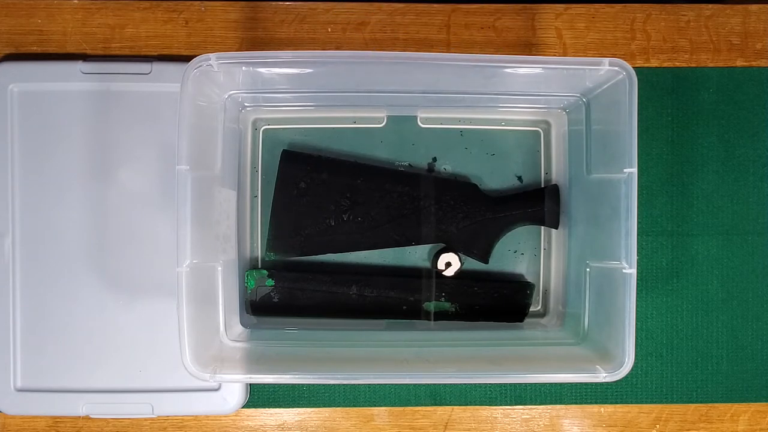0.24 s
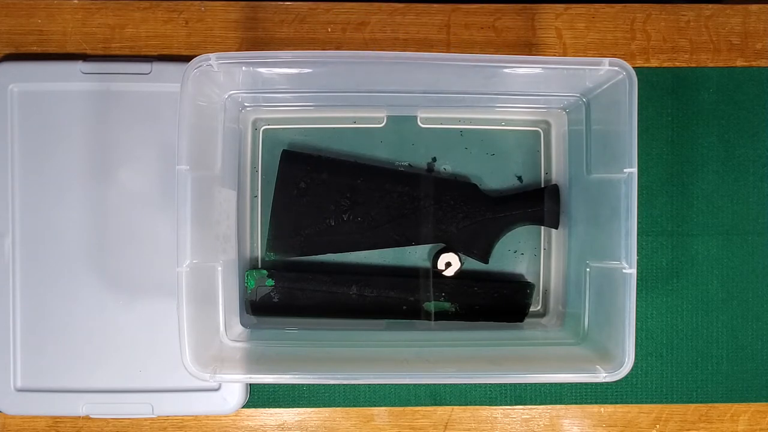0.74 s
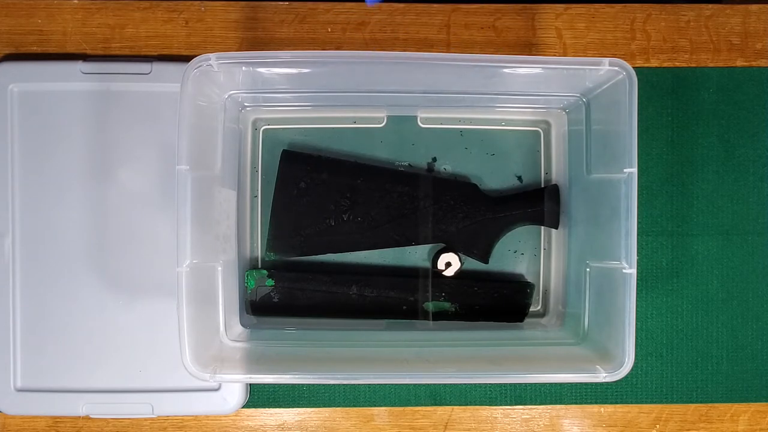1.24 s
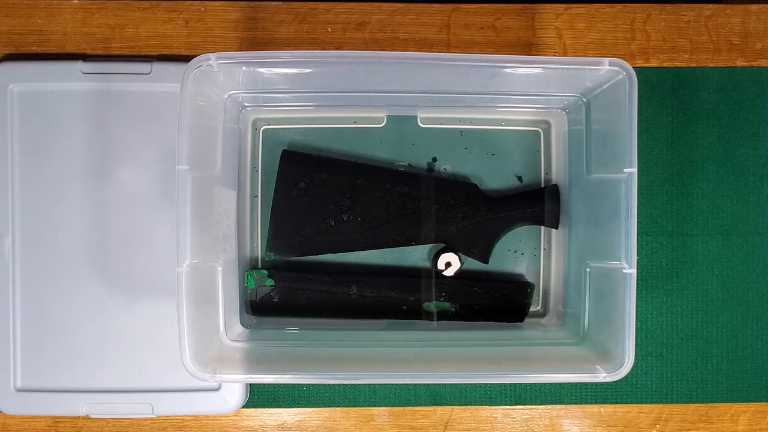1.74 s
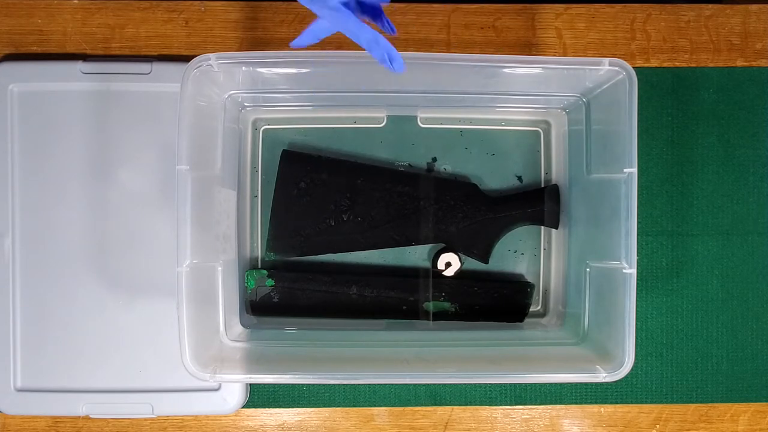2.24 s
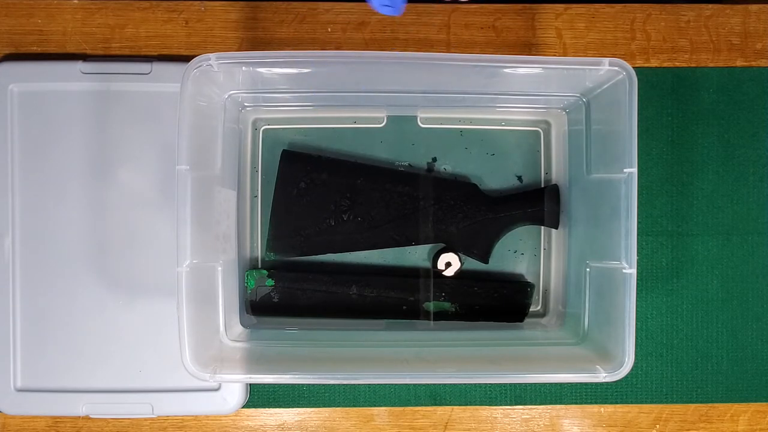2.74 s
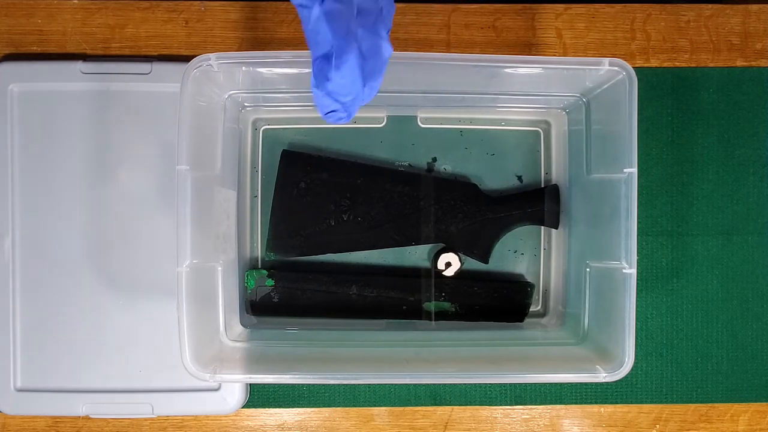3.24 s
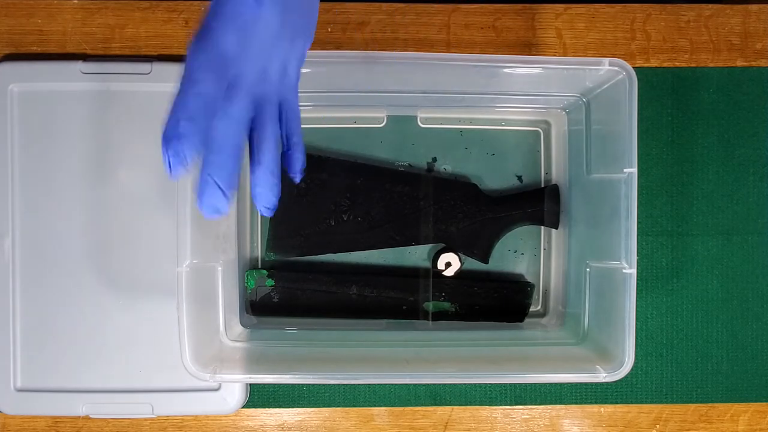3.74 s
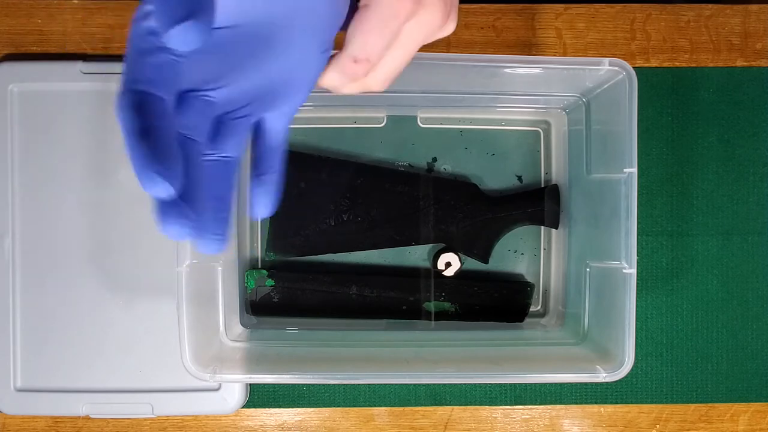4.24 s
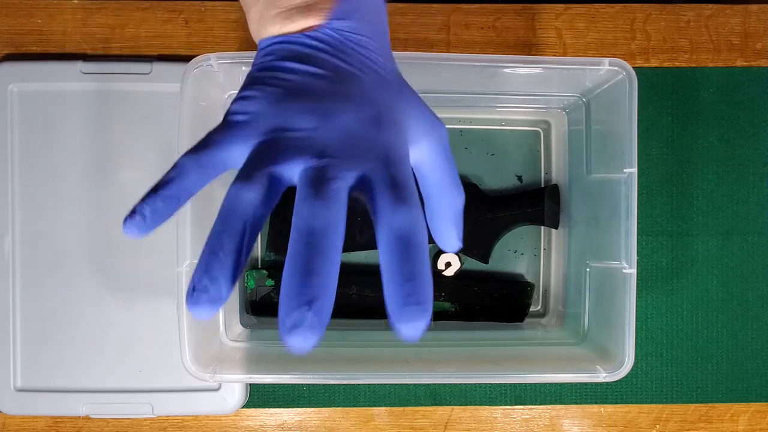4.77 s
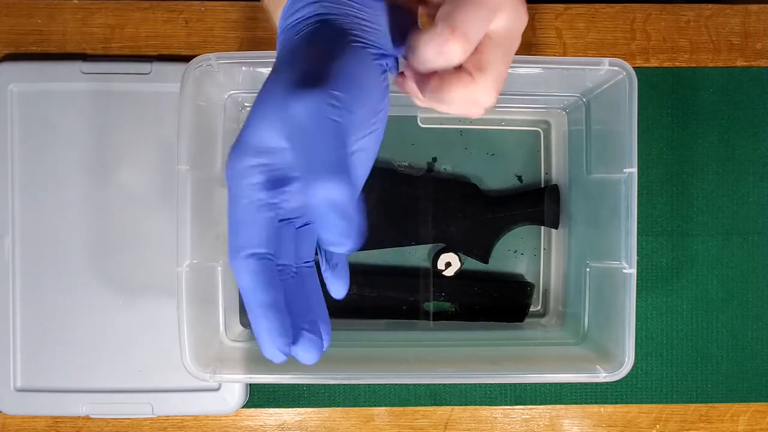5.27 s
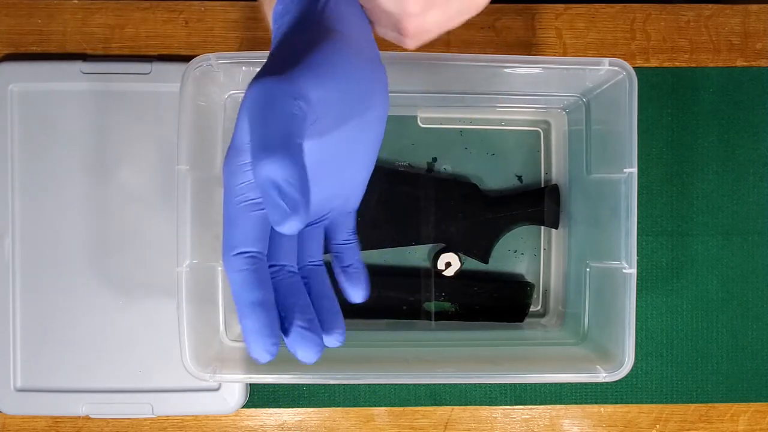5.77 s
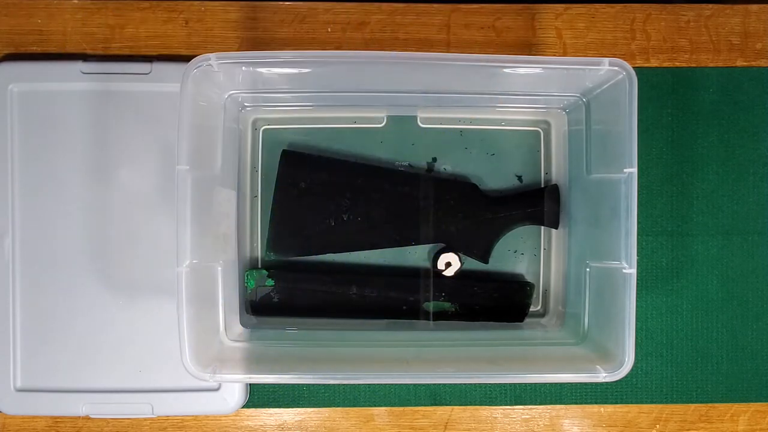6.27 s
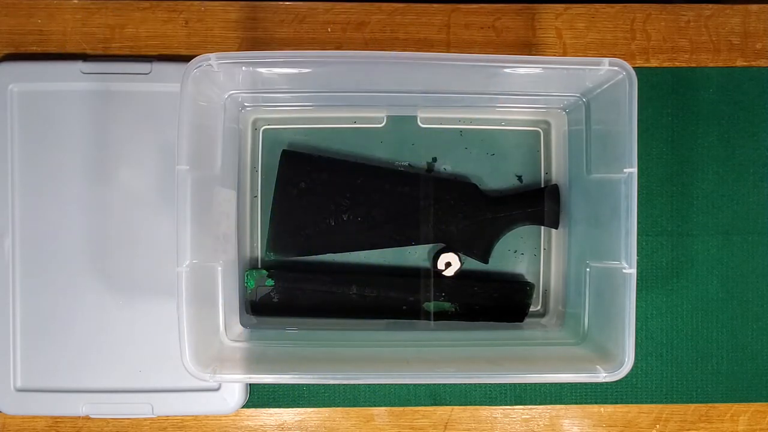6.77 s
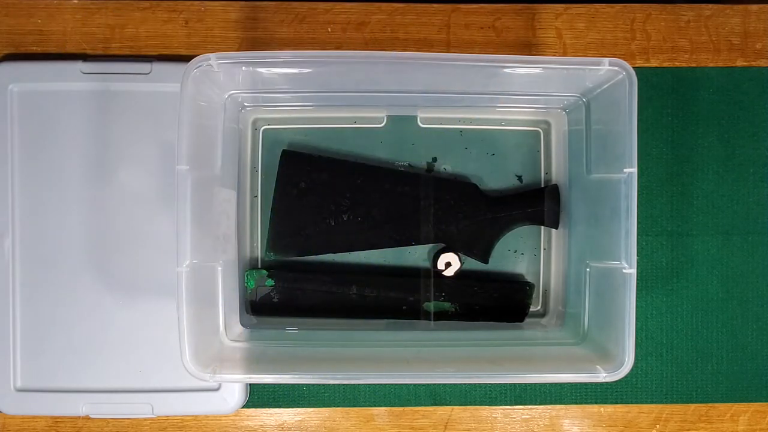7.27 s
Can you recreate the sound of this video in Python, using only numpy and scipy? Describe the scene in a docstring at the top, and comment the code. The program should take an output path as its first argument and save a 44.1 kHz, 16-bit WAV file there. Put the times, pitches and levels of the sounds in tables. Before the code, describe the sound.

Snapping, rustling and squeaky rubbing of thin rubber gloves being put on at a bench, over faint room tone and distant fan whine.

```python
"""A bench in a small room: thin rubber gloves are pulled on, over room tone and a small fan whining far off.
Sliding skin is hissing noise; crinkles are random clicks ringing patches of film; swishes are gliding noise.
Creaks are trains of slips, snaps are noise bursts, knocks are single rings and pushed air is low rumble.
The gloves also echo off the walls, and two unlike microphone ports pick everything up."""
import sys
import numpy as np
from scipy import signal
from scipy.fft import rfft, irfft
from scipy.io import wavfile

SR = 44100
rng = np.random.default_rng(int(sys.argv[2]) if len(sys.argv) > 2 else 0)


def inscribe(sig):
    """Save sig as 16-bit PCM at rate SR to the path in sys.argv[1].

    A 1-D sig is mono; a 2-D sig holds one channel per row.
    Samples are clipped to [-1, 1] before scaling.
    """
    pcm = np.round(np.clip(np.atleast_2d(sig).T, -1, 1) * 32767)
    wavfile.write(sys.argv[1], SR, pcm.astype(np.int16))


N = 331058   # length of the sound in samples


def from_db(db):
    """Turn a level in dB into a gain."""
    return 10 ** (np.asarray(db) / 20)


def rms_one(x):
    """Scale a sound to an rms (average strength) of 1."""
    return x / np.sqrt(np.mean(x ** 2) + 1e-20)


def in_time(rows):
    """Draw straight lines through a table's rows: one curve per column, one value per sample."""
    s, *columns = np.transpose(rows)
    t = np.arange(N) / SR
    return [np.interp(t, s, column) for column in columns]


def colour(x, points, share=1):
    """Filter whose gain follows the points; it answers as promptly as possible (minimum phase)."""
    hz, db = np.transpose(points)
    grid_hz = np.maximum(np.arange(1025) * SR / 2048, 1)
    gain_db = share * np.interp(np.log(grid_hz), np.log(np.maximum(hz, 1)), db)
    # Folding the cepstrum onto positive times leaves no sound before its cause.
    cepstrum = irfft(np.log(from_db(gain_db)))
    cepstrum[1:1024] *= 2
    cepstrum[1025:] = 0
    response = irfft(np.exp(rfft(cepstrum)))
    if x.ndim > 1:
        response = response[None]
    return signal.oaconvolve(x, response)[..., :x.shape[-1]]


def band(x, low_hz, high_hz):
    """Keep mainly the pitches between two limits."""
    sos = signal.butter(2, [low_hz, high_hz], "band", fs=SR, output="sos")
    return signal.sosfilt(sos, x)


def ring(x, hz, t60):
    """A unit click rings to about 1 and fades 60 dB in t60 s; thin film radiates little far below its pitch."""
    decay = from_db(-60 / (t60 * SR))
    turn = 2 * np.pi * hz / SR
    return signal.lfilter([.5, 0, -.5], [1, -2 * decay * np.cos(turn), decay * decay], x + 1e-18)


def grains(per_s, spread_db):
    """Scatter random clicks: many small, few large."""
    sizes = from_db(spread_db * np.minimum(rng.exponential(1, N), 4))
    sizes = sizes * rng.choice([-1, 1], N)
    return sizes * (rng.random(N) < per_s / SR)


def buckling(per_s, spread_db, low_hz, high_hz, cycles):
    """Each flipping fold rings a patch of its own size, fading 60 dB in the given cycles; rms 1."""
    clicks = grains(per_s, spread_db)
    patch = rng.integers(0, 16, N)
    total = np.zeros(N)
    for k, hz in enumerate(np.geomspace(low_hz, high_hz, 16)):
        total += ring(clicks * (patch == k), hz, cycles / hz)
    return rms_one(total)


SWELL_RANGE_DB = 20   # each rise or fall time covers this much


def swells(s, rise_s, fall_s, peaks_db, rest_db):
    """Gain of each layer: events climb and die straight in dB; their powers add to a rest level."""
    late = np.arange(0, N + 64, 64)[:, None] / SR - s   # one step per 64 samples
    before = -late / np.maximum(rise_s, .005)
    after = late / np.maximum(fall_s, .005)
    under_db = SWELL_RANGE_DB * np.where(late < 0, before, after)
    power = from_db(-2 * under_db) @ from_db(2 * np.transpose(peaks_db))   # doubled dB give power
    power = power + from_db(2 * np.array(rest_db))
    return [np.interp(np.arange(N) / 64, np.arange(len(p)), np.sqrt(p)) for p in power.T]


def narrow_noise(hz, width_hz):
    """Noise gathered round a pitch that may move; rms 1."""
    lowpass = signal.butter(2, width_hz / 2, fs=SR, output="sos")
    slow = signal.sosfilt(lowpass, rng.standard_normal((2, N)))
    carrier = np.exp(2j * np.pi * np.cumsum(hz * np.ones(N)) / SR)
    return rms_one(np.real((slow[0] + 1j * slow[1]) * carrier))


# Tone colour of the quiet room; only its shape counts: (frequency [Hz], gain [dB])
ROOM_COLOUR = [(15, -48.5), (25, -42), (92, 8.5), (192, -77.5), (358, -36.5), (568, 11), (787, -3.5),
               (1120, 9.5), (1430, -10.5), (1730, 5.5), (4020, -22), (6550, -7.5), (7710, -69),
               (14800, -29.5), (16500, -3.5)]
# Steady tones of the fan: (frequency [Hz], rms level [dB])
FAN_TONES = [(559.9, -82.5), (1120, -72.5)]
# Airy noise of the fan: (frequency [Hz], width [Hz], rms level [dB])
FAN_AIR = [(1675, 170, -83.5), (2280, 84, -85), (3280, 79, -86)]
ROOM_TONE_DB = -66   # rms


def background():
    """Room tone, more alike at both ports in the bass, plus a fan's slightly wavering tones and airy bands."""
    white = rng.standard_normal((3, N))
    noise = white[:2] + 0.5 * band(white[2], 20, 760)   # the third noise is shared
    total = from_db(ROOM_TONE_DB) * rms_one(colour(noise, ROOM_COLOUR))
    t = np.arange(N) / SR
    waver = np.cumsum(rng.standard_normal(N)) * 0.012   # wandering phase [radians at 1000 Hz]
    for hz, db in FAN_TONES:
        phase = 2 * np.pi * hz * t + waver * hz / 1000
        total = total + np.sqrt(2) * from_db(db) * np.sin(phase)
    for hz, width_hz, db in FAN_AIR:
        total = total + from_db(db) * narrow_noise(hz, width_hz)
    return total


# Tone colour of sliding skin; only its shape counts: (frequency [Hz], gain [dB])
HISS_COLOUR = [(2650, -30), (4500, -9.5), (5330, -13), (6550, -3), (8320, -15), (10400, -11.5),
               (11600, -10), (15000, -4), (16100, -16.5), (16500, -39.5)]
# Rubs of skin and film: (time of peak [s], rise [s], fall [s],
#   hiss level [dB], small folds level [dB], middle folds level [dB], big folds level [dB])
RUB_EVENTS = [(0.03, 0.069, 0.54, -68, -59.5, -54, -64), (0.389, 0.068, 0.084, -62, -77.5, -49.5, -50),
              (0.52, 0.41, 0.45, -66.5, -90, -66.5, -71), (0.649, 0.058, 0.086, -63.5, -57, -54.5, -57),
              (0.739, 0.026, 0.03, -84, -80, -55.5, -82), (0.805, 0.046, 0.079, -68.5, -66.5, -70, -83),
              (0.88, 0.014, 0.22, -100, -64, -60, -87), (0.95, 0.13, .12, -74, -59, -74, -92),
              (1.006, 0.042, 0.45, -66, -57, -49.5, -59), (1.27, 0.57, 0.12, -70, -89.5, -84.5, -94.5),
              (1.48, 0.05, 0.78, -72.5, -84, -98, -94), (1.708, 0.11, 0.13, -59, -58, -50.5, -87),
              (1.831, 0.013, 0.18, -53, -61, -58, -53), (1.899, 0.11, 0.17, -48.5, -42, -42, -53),
              (2.15, 0.052, 0.14, -59.5, -50.5, -47.5, -72), (2.445, 0.028, 0.21, -72, -65, -71.5, -94),
              (2.548, 0.061, 0.12, -55, -62.5, -59.5, -78), (2.69, 0.34, 0.42, -64, -69, -64, -75),
              (2.845, 0.11, 0.14, -56.5, -59, -64, -72), (2.912, 0.12, 0.072, -63, -57, -50, -50.5),
              (3.03, 0.34, 0.98, -91, -75, -64.5, -85), (3.25, 0.51, 0.23, -90, -99, -65, -70),
              (3.32, 0.066, 0.99, -82, -63, -55, -57), (3.502, 0.12, 0.089, -48, -48.5, -56.5, -54),
              (3.554, 0.037, 0.14, -51, -71, -63.5, -58.5), (3.672, 0.014, 0.14, -62, -55.5, -63, -58),
              (3.73, 0.13, 0.38, -45.5, -53.5, -49.5, -55.5), (3.92, 1, 0.3, -55, -75, -70, -107),
              (4.117, 0.097, 0.026, -47, -57, -53, -101), (4.17, 0.09, 0.063, -45.5, -45.5, -43.5, -81.5),
              (4.335, 0.059, 0.066, -42.5, -63, -53, -56), (4.387, 0.11, 0.055, -40.5, -37.5, -32.5, -59),
              (4.601, 0.096, 0.05, -66, -43, -42, -55), (4.773, 0.042, 0.12, -50.5, -54.5, -57.5, -61),
              (4.968, 0.16, 0.52, -60, -66.5, -62, -69.5), (5.16, 0.069, 0.087, -46, -49, -55, -71),
              (5.33, 0.24, 0.16, -65, -68.5, -65, -76), (5.525, 0.19, 0.073, -57.5, -61.5, -58, -70),
              (5.665, 0.076, 0.052, -57, -63.5, -65.5, -76),
              (5.842, 0.11, 0.19, -60.5, -109.5, -64.5, -110), (5.95, 0.051, 0.25, -59, -71, -78, -90),
              (6.1, 0.43, 0.024, -72, -58.5, -62, -73), (6.16, 0.029, 0.086, -61.5, -63, -61, -68.5),
              (6.382, 0.039, 0.03, -48.5, -57, -67, -81), (6.691, 0.18, 0.061, -74, -83, -81, -87),
              (6.87, 0.039, 0.45, -83, -77, -67.5, -81), (6.995, 0.026, 0.17, -69, -74, -75, -99.5),
              (7.15, 0.088, 0.54, -75, -76, -71, -89), (7.319, 0.37, 0.24, -70.5, -88, -68, -81),
              (7.48, 0.06, .3, -66, -95, -69.5, -93)]
# Hands at rest: (hiss level [dB], small folds level [dB], middle folds level [dB], big folds level [dB])
HANDS_AT_REST = (-96.5, -102.5, -83.5, -93.5)


def rustle():
    """Sliding skin hisses, and folds of film crinkle: the smaller the fold, the higher."""
    s, rise_s, fall_s, *peaks_db = np.transpose(RUB_EVENTS)
    hiss = rms_one(colour(grains(9000, 4), HISS_COLOUR))
    small = rms_one(band(buckling(1500, 3.3, 2100, 4600, cycles=12), 1700, 4800))
    middle = band(buckling(800, 3.23, 868, 2200, cycles=8), 600, 3600)
    big = band(buckling(500, 3.5, 260, 950, cycles=11), 210, 1500)
    gains = swells(s, rise_s, fall_s, peaks_db, HANDS_AT_REST)
    return sum(gain * layer for gain, layer in zip(gains, [hiss, small, middle, big]))


# Snaps of film letting go: (time [s], ring peak level [dB], ring frequency [Hz],
#   crack peak level [dB], thump peak level [dB])
SNAP_EVENTS = [(0.02, -25.5, 1470, -34, -37), (0.0728, -15, 1580, -2, -25),
               (0.3252, -29.5, 1100, -31, -38.5), (0.3268, -27, 3000, -29.5, -41),
               (0.427, -41, 970, -47, -37), (0.449, -44, 1300, -55, -41.5), (0.488, -44, 1000, -63, -57),
               (0.733, -49, 2280, -53.5, -56.5), (0.876, -43.5, 2720, -51, -51.5),
               (1.026, -9.5, 1777, -4.5, -19.5), (1.7378, -30.5, 2430, -54, -52),
               (1.775, -35, 2410, -58, -50), (1.813, -30, 2560, -42, -58), (1.957, -26, 2700, -39, -52),
               (1.964, -21, 2800, -36, -51), (1.981, -22, 2600, -35, -48.5), (2.001, -17, 2750, -30, -41),
               (2.1649, -23.5, 1430, -36, -58.5), (2.1684, -10, 1930, -7.5, -32),
               (2.4476, -49, 4500, -59, -71), (2.541, -42, 1600, -47, -73), (2.746, -47, 1240, -35.5, -51),
               (2.800, -36.5, 1520, -40.5, -44), (2.812, -34.5, 4020, -39, -65), (2.86, -41, 960, -31, -59),
               (2.908, -40, 1324, -57, -47), (3.3262, -36.5, 930, -45, -59),
               (3.6968, -35.5, 1100, -28, -38), (3.713, -43, 1300, -34, -38), (3.7229, -23, 2760, -30, -29),
               (3.8284, -34, 1140, -48, -67), (3.926, -34, 1770, -24, -50), (3.9283, -33.5, 790, -18, -82),
               (4.1343, -34, 2540, -18.5, -71.5), (4.199, -30, 877, -34, -57),
               (4.288, -44, 900, -46.5, -39), (4.312, -14.5, 1500, -31, -44),
               (4.3136, -20.5, 2900, -39.5, -61), (4.3693, -10.5, 3420, -4.5, -20),
               (4.402, -19, 880, -39, -29), (4.408, -18.5, 874, -32.5, -24.5), (4.513, -34, 3220, -35, -59),
               (4.514, -40.5, 2200, -48, -66), (4.524, -29.5, 3240, -30.5, -62),
               (4.543, -28, 1120, -22, -43), (4.5649, -22.5, 3320, -21, -39), (4.568, -9.5, 3160, -10, -33),
               (4.597, -27, 2900, -53, -46.5), (4.606, -30, 2940, -41, -55), (4.614, -22.5, 2660, -42, -44),
               (4.6226, -25.5, 2290, -30, -38), (4.985, -49, 895, -49, -43.5), (5.032, -57, 900, -59, -45),
               (5.108, -26, 2300, -30, -54), (5.110, -25.5, 3600, -26, -65), (5.227, -39.5, 1750, -57, -68),
               (5.239, -48, 1700, -55, -60), (5.392, -40.5, 1230, -41, -45.5), (5.418, -64, 1800, -48, -74),
               (5.473, -49, 1800, -33, -66), (5.49, -36, 2220, -25.5, -48), (5.492, -45, 2200, -32, -45),
               (5.579, -64, 3500, -40, -58), (5.626, -70, 3500, -44, -73), (5.715, -66, 3500, -47, -71.5),
               (5.913, -26, 1400, -24, -52.5), (5.9803, -20, 1200, -6.5, -32.5),
               (6.13, -49, 1090, -58, -47.5), (6.408, -15.5, 3130, -24, -44.5),
               (6.413, -36, 2350, -54, -60), (6.865, -55.5, 1150, -61.5, -55.5)]
# Tone colour of a crack; only its shape counts: (frequency [Hz], gain [dB])
CRACK_COLOUR = [(2060, -36), (3500, 5.5), (4090, 8), (5200, 4.5), (5770, 10.5), (8030, 4.5), (11000, 3),
                (15000, 8), (16000, -0.5), (16500, -33)]
SNAP_T60_S, SNAP_RISE_S = 0.021, 0.00087
OVERTONE, OVERTONE_DB = 2.2, -7.5   # a patch also rings this many times higher, at this level


def snaps():
    """A burst of film letting go rings a patch, cracks in the treble and thumps the air.
    Returns the direct sound, and the sound sent all round, where the burst's ripples average out."""
    size = 4096   # samples per snap
    direct, around = np.zeros(N + size), np.zeros(N + size)
    t = np.arange(size) / SR
    click = 1. * (t == 0)
    noises = rng.standard_normal((len(SNAP_EVENTS), size))
    for (s, ring_db, hz, crack_db, thump_db), noise in zip(SNAP_EVENTS, noises):
        burst = noise * np.minimum(t / SNAP_RISE_S, 1) * np.exp(-np.log(1000) * t / SNAP_T60_S)
        burst *= 1 + 3 * np.exp(-t / 0.00064)   # extra strength at the start
        # The first contact is the hardest, more so in strong snaps.
        burst[0] += from_db(0.17 * ring_db + 24.5)

        def patch(x):
            overtone = from_db(OVERTONE_DB) * ring(x, OVERTONE * hz, 3 / hz)
            return band(ring(x, hz, 7.25 / hz) - overtone, 1100, 6300)

        def crack(x):
            return colour(x, CRACK_COLOUR)

        def thump(x):
            return band(x, 270, 815)

        i = round(s * SR)
        for shape, peak_db in [(patch, ring_db), (crack, crack_db), (thump, thump_db)]:
            part = shape(burst)
            part *= from_db(peak_db) / np.abs(part).max()
            direct[i:i + size] += part
            around[i:i + size] += rms_one(shape(click)) * np.std(part)
    return direct[:N], around[:N]


# Knocks that set the air inside the glove ringing:
#   (time [s], frequency [Hz], peak level [dB], time to fade 60 dB [s])
KNOCK_EVENTS = [(0.074, 252, -35, 0.11), (1.024, 1910, -23.5, 0.039), (2.17, 189, -40.5, 0.13),
                (2.912, 148, -41, 0.076), (3.547, 340, -46.5, 0.091), (3.828, 930, -30.5, 0.017),
                (4.37, 198, -33.5, 0.1), (6.867, 1570, -53, 0.053)]


def knocks():
    """Each knock is one click that rings the air inside the glove at its own pitch."""
    out = np.zeros(N)
    click = 1. * (np.arange(8192) == 0)
    for s, hz, db, t60 in KNOCK_EVENTS:
        i = round(s * SR)
        out[i:i + 8192] += from_db(db) * ring(click, hz, t60)
    return out


# Air pushed at the ports: (time [s], level [dB])
AIR_PUSHES = [(0.08, -64), (1.03, -62.5), (1.88, -68), (2.176, -55), (2.919, -51.5), (3.74, -58.5),
              (4.37, -52.5), (4.58, -64), (5.99, -53), (6.16, -56)]
AIR_RISE_S, AIR_FALL_S, STILL_AIR_DB = 0.03, 0.065, -90


def puffs():
    """Air pushed by the hands rumbles on both ports, mostly alike."""
    shared, own = rng.standard_normal(N), rng.standard_normal((2, N))
    rumble = rms_one(band(band(shared + 0.3 * own, 45, 220), 40, 300))
    s, db = np.transpose(AIR_PUSHES)
    gain, = swells(s, AIR_RISE_S, AIR_FALL_S, [db], [STILL_AIR_DB])
    return gain * rumble


# Creaks of stretched film; levels are before the fixed gains below: (start time [s], length [s],
#   slip rate at the start [per s], film ring level at the end [dB], hollow ring level at the end [dB],
#   hollow frequency [Hz], growth as the film tightens [dB])
CREAK_EVENTS = [(0.357, 0.055, 250, -68, -57.5, 1110, 11), (1.661, 0.076, 200, -51.5, -55, 730, 16.5),
                (1.815, 0.097, 167, -39.5, -51.5, 594, 15), (1.926, 0.027, 150, -41, -71, 700, 6),
                (3.288, 0.026, 260, -52, -65, 668, 14), (4.256, 0.051, 160, -76, -54, 630, 10),
                (4.325, 0.041, 230, -47, -41, 550, 14.5), (4.373, 0.056, 210, -42.5, -47.5, 824, -4)]
CREAK_SLOWING = .015   # each slip waits about this share longer than the last
HOLLOW_T60_S = 0.015


def creaks():
    """Film sticks and slips on an uneven clock; each slip rings the taut film and the glove's hollow."""
    film, hollow = np.zeros((2, N))
    for start, length, per_s, film_db, hollow_db, hollow_hz, growth_db in CREAK_EVENTS:
        jitter, size = rng.standard_normal((2, 40))   # at most 40 slips
        waits = np.exp(0.2 * jitter + CREAK_SLOWING * np.arange(40)) / per_s
        since = np.cumsum(waits)
        slip_db = 3 * size - growth_db * (1 - since / length) - 6
        slips = np.zeros(N)
        slips[((start + since) * SR).astype(int)] = from_db(slip_db) * (since < length)
        film += slips * from_db(film_db)
        hollow += from_db(hollow_db) * ring(slips, hollow_hz, HOLLOW_T60_S)
    film = ring(film, 2800, .003) - ring(film, 4100, .002) + .6 * ring(film, 1600, .003)
    film = band(film, 1100, 5600)
    # Brief rings peak far above their mean level, so both are raised.
    return from_db(26) * film + from_db(24.5) * hollow


# Film sliding smoothly over film: (time of peak [s], rise [s], fall [s], level of each band [dB],
#   low band frequency at the peak [Hz], high band frequency [Hz], glide of low band [octaves per s])
SWISH_EVENTS = [(0.882, 0.009, 0.28, -60, 1900, 2807, 0.06), (1.3, 0.2, 0.11, -72, 1194, 3400, 0.8),
                (1.712, 0.073, 0.11, -49.5, 750, 1698, -3.5), (1.863, 0.034, 0.086, -47, 617, 2410, 2),
                (2.128, .03, 0.2, -56.5, 752, 2486, 2.5), (3.46, 0.051, 0.18, -54.5, 1900, 3320, -0.4),
                (4.112, 0.034, 0.11, -49, 1604, 2890, -3.5), (4.375, 0.058, 0.052, -36.5, 653.7, 3120, 4.0),
                (5.155, 0.091, 0.094, -54.5, 1900, 3950, -3), (5.532, 0.021, 0.043, -58, 2020, 3570, 0.3)]
SWISH_WIDTH_HZ = 260   # the high band is twice as wide


def swishes():
    """Smooth friction sounds through two resonances of the glove; the lower glides as the hand fills it."""
    s, rise_s, fall_s, db, low_hz, high_hz, glide = np.transpose(SWISH_EVENTS)
    t = np.arange(N) / SR
    nearest = np.searchsorted((s[1:] + s[:-1]) / 2, t)   # which swish is closest in time
    glide_s = np.clip(t - s[nearest], -.1, .2)
    moving_hz = low_hz[nearest] * 2 ** (glide[nearest] * glide_s)
    low = narrow_noise(moving_hz, SWISH_WIDTH_HZ)
    high = narrow_noise(high_hz[nearest], 2 * SWISH_WIDTH_HZ)
    gain, = swells(s, rise_s, fall_s, [db], [-140])
    return gain * (low + high)


ROOM_T60_S, ECHO_RISE_S = 0.24, 0.0008


def room(x):
    """Echoes from the walls: noise dying away, different at each port, alike only in the bass."""
    t = np.arange(round(.4 * SR)) / SR
    own, shared = rng.standard_normal((2, len(t))), rng.standard_normal(len(t))
    # Echoes come in clumps of 200 samples.
    clumps = np.repeat(rng.standard_normal((2, len(t) // 200 + 1)), 200, axis=1)[:, :len(t)]
    tail = band(own * from_db(0.56 * clumps), 810, 16000) + band(shared, 270, 620)
    tail = tail * np.exp(-np.log(1000) * t / ROOM_T60_S) * np.minimum(t / ECHO_RISE_S, 1) ** 2
    tail /= np.sqrt(np.sum(tail ** 2, axis=1, keepdims=True))
    return signal.oaconvolve(x[None], tail)[:, :N]


# Where the hands are; the echo falls as they come nearer:
#   (time [s], echo level [dB], left over right level [dB])
HAND_PLACES = [(0, -2.5, 2.5), (1, -1.5, 0.91), (1.7, -9, 0.45), (2.02, -3.5, 1.3), (2.17, -4.5, 1.1),
               (3.8, -2, 1.6), (4.3, -7, 1.1), (4.6, -8, 2.8), (5.3, -6, 1.8), (6, 0.5, 2), (6.5, -3, 1.5),
               (7.5, 2, 4)]
RIGHT_LAG_S = .00005


def scene():
    """The gloves, heard directly and through the room, with pushed air and the background."""
    echo_db, bearing_db = in_time(HAND_PLACES)
    direct, around = snaps()
    handling = rustle() + creaks() + swishes() + knocks()
    wet = room(from_db(echo_db) * (around + handling))
    gloves = (direct + handling) * from_db([bearing_db / 2, -bearing_db / 2])
    # The direct sound reaches the right port slightly later.
    hz = np.arange(N // 2 + 1) * SR / N
    gloves[1] = irfft(rfft(gloves[1]) * np.exp(-2j * np.pi * hz * RIGHT_LAG_S), N)
    return gloves + wet + puffs() + background()


# How the two ports differ: (frequency [Hz], left over right level [dB])
PORT_DIFFERENCE = [(60, -5), (110, 3.5), (200, -3), (380, 2), (700, 1.5), (1290, 2.5), (2380, 4),
                   (4400, 3.5), (8120, 4), (15000, 17)]
STEP_HZ, CUTOFF_HZ = 15800, 17100


def record(dry):
    """The left port is louder and much brighter; peaks are rounded; the treble drops a step, then is cut."""
    left = colour(dry[0], PORT_DIFFERENCE, share=.5)
    right = colour(dry[1], PORT_DIFFERENCE, share=-.5)
    step = signal.ellip(4, .5, 14, STEP_HZ, fs=SR, output="sos")   # about 14 dB down above the step
    ports = signal.sosfilt(step, np.array([left, right]))
    ports = .95 * np.tanh(ports / .95)
    cut = signal.cheby2(16, 60, CUTOFF_HZ, fs=SR, output="sos")   # 60 dB down from the cutoff up
    return signal.sosfilt(cut, ports)


dry = scene()
out = record(dry)
inscribe(out)
```